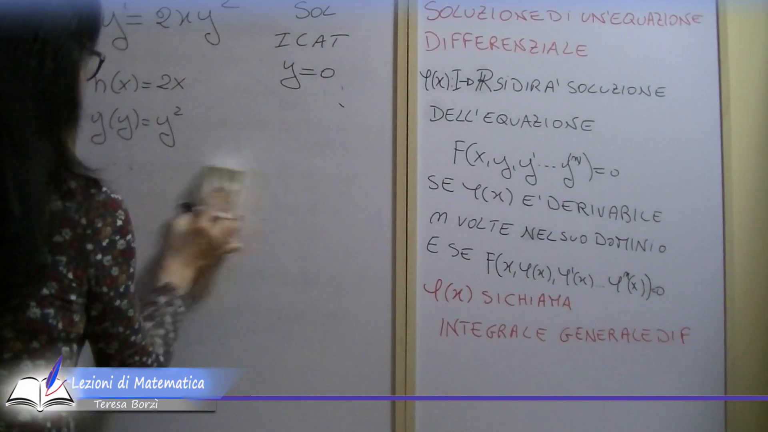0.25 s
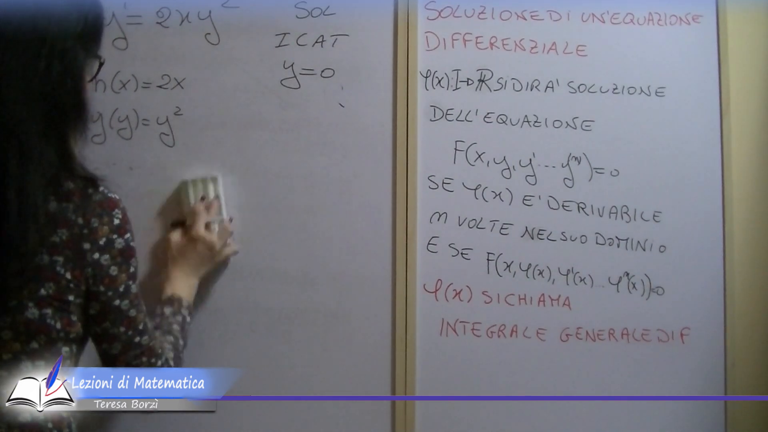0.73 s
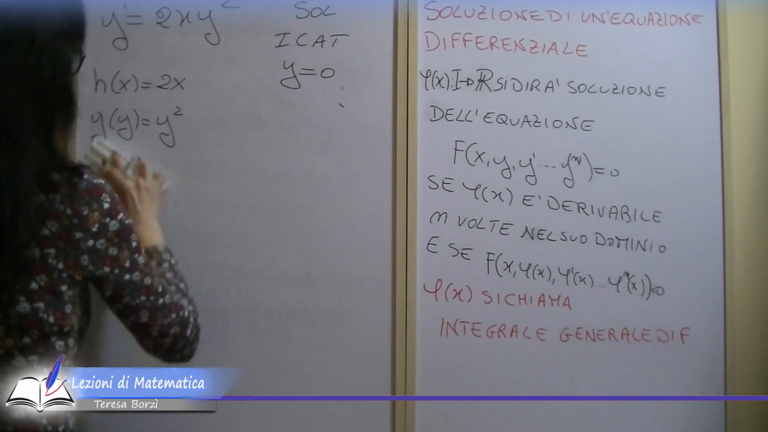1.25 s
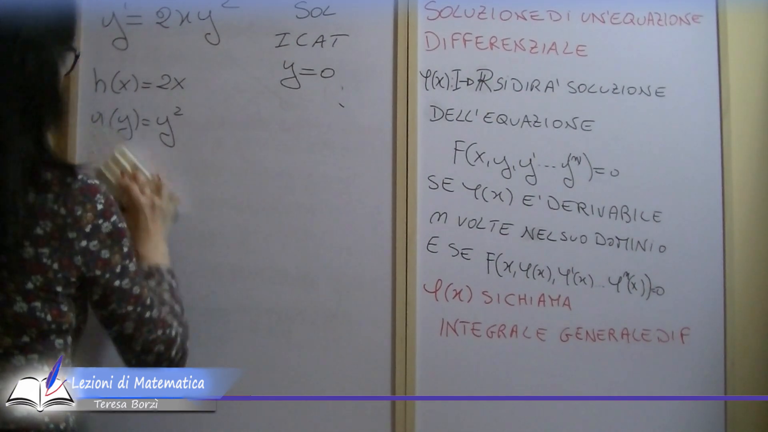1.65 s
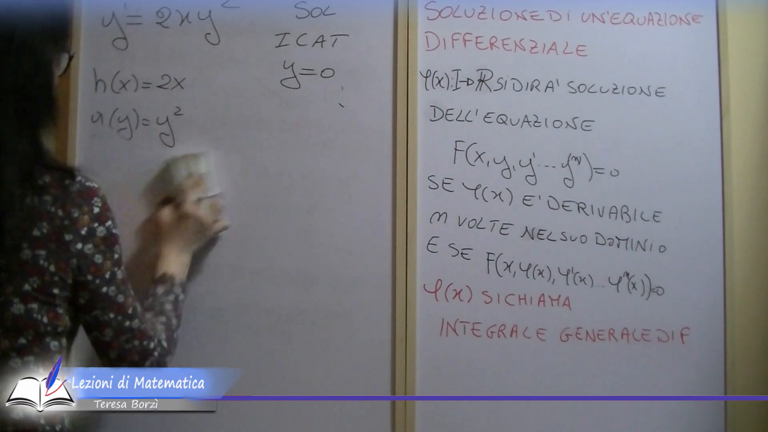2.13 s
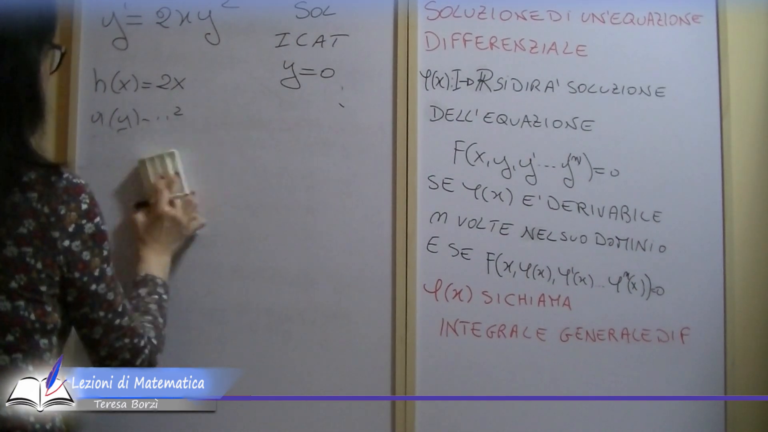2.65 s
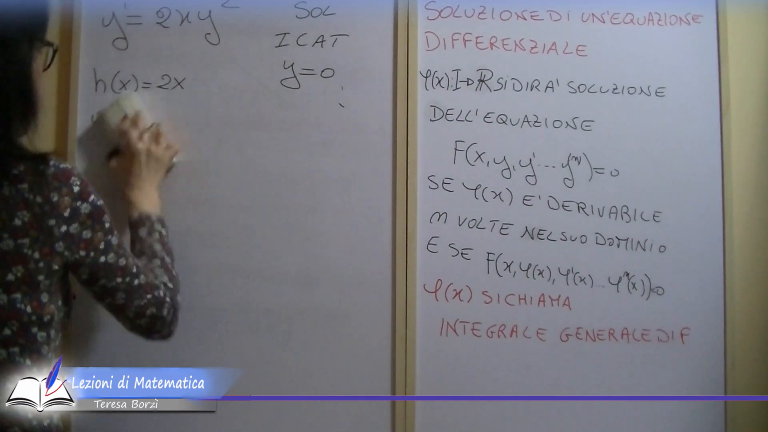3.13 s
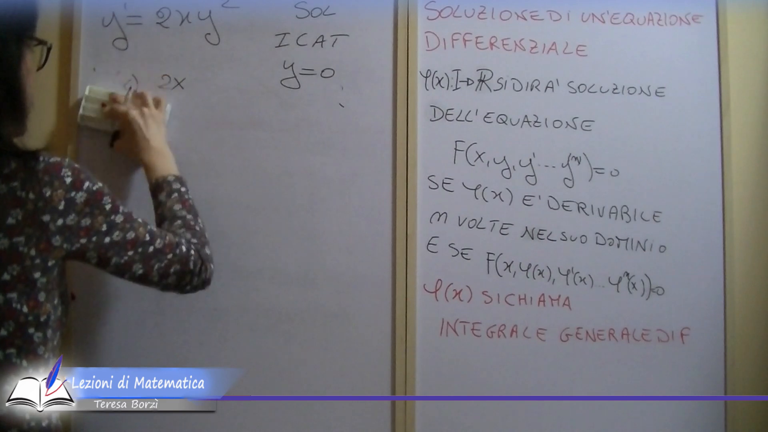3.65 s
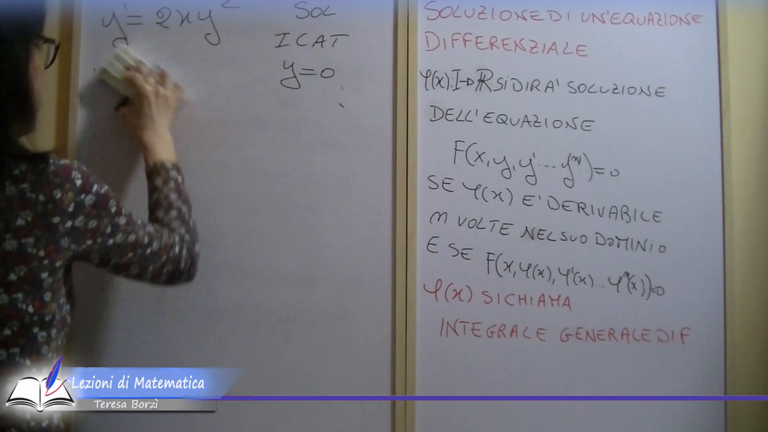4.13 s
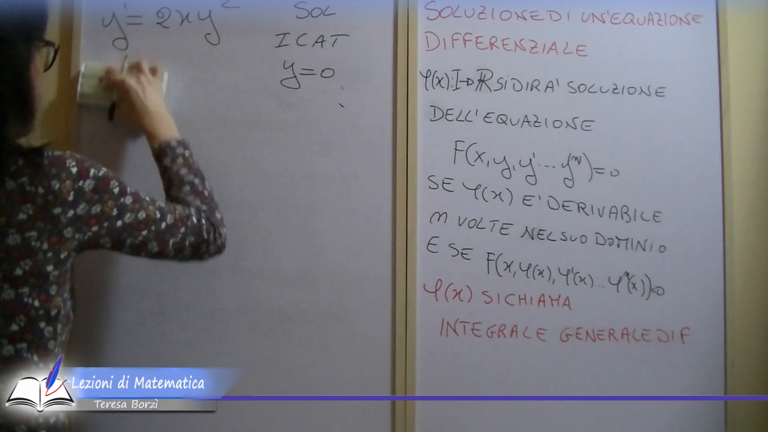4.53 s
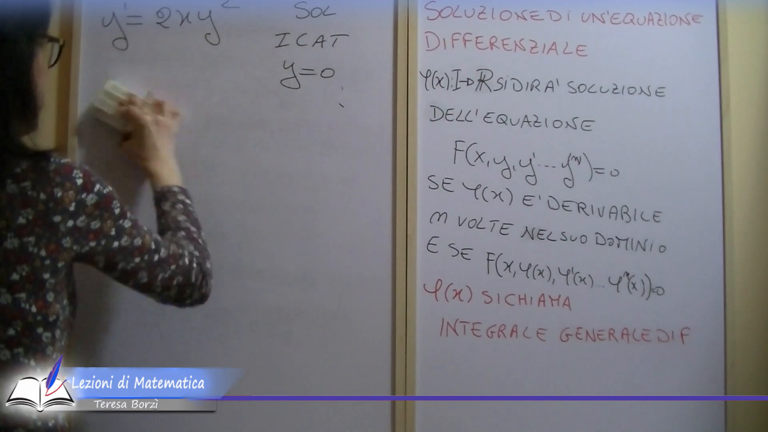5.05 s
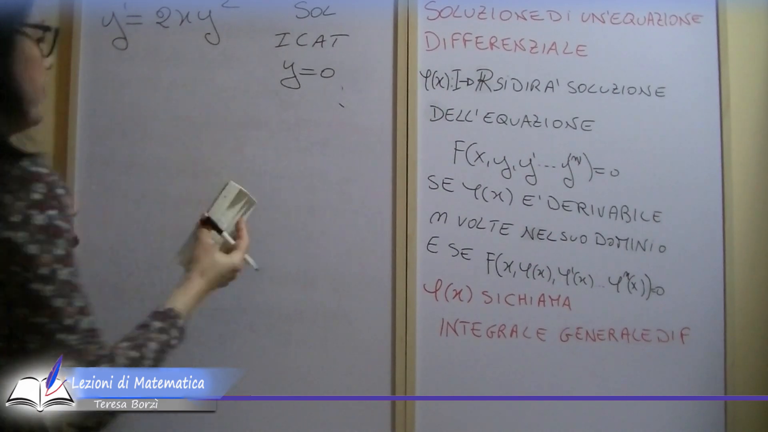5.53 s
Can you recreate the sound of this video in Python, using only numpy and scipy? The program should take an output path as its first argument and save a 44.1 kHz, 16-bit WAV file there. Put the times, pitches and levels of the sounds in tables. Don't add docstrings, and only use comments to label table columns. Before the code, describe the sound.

In a small quiet room with constant soft air and microphone hiss, a felt eraser is already rubbing a whiteboard. The dry, breathy strokes run almost without a break, dipping briefly as the direction turns, most clearly near 1.0, 1.4, 3.4 and 4.4 seconds. The panel gives the hiss a slight midrange ring, and faint low rumbles come about twice a second as the arm leans in. At 1.3 seconds the wrist meets the board with a dull, soft bump; slight fibre catches brush by around 1.2, 3.6 and 4.9. From about 5.1 the rubbing eases away, and at 5.4 the felt peels off with a small scuff. A light, short tap on the block follows at 5.53, then soft finger fumbling from 5.6 to the end. The sound is nearly centred, hollow and comb-coloured by a very short echo, with barely audible hum and a thin high whistle.

```python
import sys
import numpy as np
from scipy import signal
from scipy.fft import rfft, irfft, next_fast_len
from scipy.io import wavfile

SR = 44100
rng = np.random.default_rng(int(sys.argv[2]) if len(sys.argv) > 2 else 0)


def dump_mix(stems):
    frames = np.atleast_2d(stems).T
    limited = np.clip(frames, -1, 1)
    pcm = np.round(limited * 32767).astype(np.int16)
    wavfile.write(sys.argv[1], SR, pcm)


def volts_from_decibels(level):
    exponent = np.asarray(level, float) / 20
    return 10 ** exponent


N = 255383
T = np.arange(N) / SR
PAD = next_fast_len(N + 8192)
HZ = np.maximum(np.arange(PAD // 2 + 1) * SR / PAD, 1)

# frequency in Hz, level in dB.
AIR_COLOUR = [(30, -28), (100, -33), (250, -13), (535, -2), (1100, -0.5), (2000, -2), (4500, -3),
              (6600, -6), (9000, -8.5), (12000, -13.5), (15700, -30)]
# frequency in Hz, side minus middle in dB.
AIR_WIDTH = [(30, 2), (200, -3), (700, -14), (2000, -16), (5500, -16), (8000, -17), (15000, -27)]
# frequency in Hz, level in dB.
FELT_COLOUR = [(150, -49), (250, -35), (545, -19.5), (637, -32), (707, -6), (771, -10.5), (826, -7.5),
               (1130, -2.5), (1340, -4), (2590, -4), (3250, -4), (5090, -3.5), (6720, -10.5), (9340, -8),
               (15700, -17.5)]
# frequency in Hz, side minus middle in dB.
BOARD_WIDTH = [(60, -8), (380, -12), (700, -18), (1290, -27), (2400, -22), (3500, -20), (5300, -14),
               (7500, -17.5), (10000, -17), (12000, -18.5), (15000, -28)]
# frequency in Hz, width in Hz, level over the hiss in dB.
BOARD_RINGS = [(1010, 58, -4.5), (1126, 31, -2), (1224, 40, -7), (678, 16, -10), (862, 18, -9),
               (3235, 60, -8), (3300, 59, -5.5), (3330, 230, -12.5), (4220, 1800, -7.5), (10400, 2300, -1)]
# time in seconds, extra share of ringing.
PANEL_SHARE = [(0.0, .6), (0.6, 0.47), (1.0, -0.041), (1.6, .2), (2.3, 0.25), (2.9, 0.38), (3.5, -.3),
               (4.3, -.25), (5.2, 0.025)]
# time in seconds, speed as hiss in dB, pressure in dB,
# pad flat on its fine face in dB.
ARM_SWEEP = [(0.0, -41.5, -0.5, -1), (0.33, -43, -2, 0), (0.57, -41.5, -1, 0.5), (0.92, -41, -1, -2),
             (1.14, -41, -3.5, -3), (1.33, -41.5, 1.5, -4), (1.6, -42, -0.5, -1.5), (1.9, -42, 0.5, -0.5),
             (2.33, -41, -1, -1.5), (2.63, -44.5, -0.5, .5), (2.98, -43.5, 0, -0.5), (3.1, -41, 2, -2.5),
             (3.55, -40.5, -1, -2), (3.75, -41.5, 0, -.5), (4.04, -40.5, 0, -1.5), (4.36, -42.5, -1.5, -2),
             (4.6, -42, 0.5, -1.5), (5.07, -40.5, 1.5, -1.5)]
# time in seconds, loss in dB, half length in seconds.
STROKE_TURNS = [(0.142, 2.5, 0.03), (0.723, 2, 0.081), (1.008, 5, 0.033), (1.425, 10, .072),
                (1.77, 2, 0.049), (2.1, 1.5, 0.11), (2.48, 3, 0.043), (3.2, 3, 0.036), (3.425, 5.5, .03),
                (3.606, 4.5, .045), (3.88, 3, 0.058), (4.172, 2.5, .04), (4.307, 2, 0.051),
                (4.43, 4.5, 0.028), (4.844, 2, 0.04), (4.998, 1.5, 0.036)]
# frequency in Hz, level in dB.
RUMBLE_COLOUR = [(40, -22), (70, -8), (110, -4.5), (190, -1), (300, 4.5), (450, 0), (700, -37)]
# time in seconds, rumble in dB.
ARM_LEANS = [(0.17, -65), (0.65, -69.5), (1.13, -70), (1.34, -70), (1.63, -70), (2.08, -74), (2.56, -71),
             (3.06, -70.5), (3.55, -72), (4.0, -70), (4.51, -70), (4.98, -70), (5.42, -77), (5.6, -75)]
# time in seconds, frequency in Hz, width in Hz,
# time to fall 60 dB in seconds, level in dB.
SMALL_RUBS = [(0.002, 650, 300, 0.69, -52), (0.15, 350, 300, 0.67, -54.5), (1.325, 950, 170, .13, -46),
              (5.298, 1600, 690, .04, -52), (5.34, 1130, 60, .5, -56), (5.422, 900, 150, .17, -45),
              (5.435, 5855, 330, 0.33, -51), (5.455, 950, 100, .1, -48), (5.655, 1900, 1400, .11, -49),
              (5.69, 570, 120, 0.15, -65), (5.783, 1000, 1900, 0.33, -46), (5.787, 1040, 360, .25, -53)]
FIBRE_CATCHES = [
    (1.17, 5000, 1100, .14, -52),
    (3.64, 7100, 1200, .14, -56),
    (4.85, 5300, 2000, .11, -55),
    (5.41, 5500, 2500, .11, -56),
]
# frequency in Hz, width in Hz,
# time to fall 60 dB in seconds, level in dB.
WRIST_BUMP = [(262, 33, .64, -57), (413, 50, .57, -51.5), (540, 83, 0.64, -48.5), (710, 340, 0.22, -39.5),
              (2190, 220, .1, -45)]
FELT_PEEL = [(80, 80, .15, -86), (1900, 1400, .16, -47), (4440, 600, .12, -49.5), (4750, 660, 0.14, -48),
             (11500, 5000, 0.32, -54)]
TAP_IN_ROOM = [(526, 240, 0.64, -50)]
HAND_REGRIP = [(392, 100, 0.5, -63), (540, 110, 0.32, -57.5), (1290, 550, .2, -46.5), (1900, 500, .2, -46),
               (2600, 3500, 0.25, -49), (9500, 6000, .3, -60)]
# frequency in Hz, level in dB, time to fall 60 dB in seconds.
BLOCK_RINGS = [(540, -6, 0.036), (1400, -2, .012), (2050, -4, .012)]
# frequency in Hz, level in dB.
ECHO_GAIN = [(300, -12), (1000, -5), (3000, -7), (8000, -6.5), (15000, -7)]
# frequency in Hz, average level in dB.
SCAN_WHISTLES = [(15625, -61), (11725.5, -80), (7825.3, -76)]
# frequency in Hz, average level in dB.
MAINS_HUM = [(50, -104), (100, -98), (150, -91), (200, -86), (250, -89)]

TAP_S = 5.5315


def rms_one(x):
    return x / np.sqrt(np.mean(x ** 2) + 1e-20)


def in_time(rows):
    s, *columns = np.transpose(rows)
    return [np.interp(T, s, c) for c in columns]


def at_hz(points, hz):
    table_hz, db = np.transpose(points)
    return np.interp(np.log(hz), np.log(np.maximum(table_hz, 1)), db)


def drift(rate):
    r = np.exp(-80 * np.pi * rate / SR)
    noise = rng.standard_normal(N // 40 + 2002)
    slow = signal.lfilter([1], [1, -2 * r, r * r], noise)[2000:]
    return np.interp(np.arange(N) / 40, np.arange(len(slow)), rms_one(slow))


def resonate(x, hz, width_hz):
    r = np.exp(-np.pi * width_hz / SR)
    feed = np.array([1, 0, -1]) * (1 - r * r) / 2
    return signal.lfilter(feed, [1, -2 * r * np.cos(2 * np.pi * hz / SR), r * r], x)


def coloured(colour, spread, side_db=0):
    mid, side = rfft(rng.standard_normal((2, PAD))) * volts_from_decibels(at_hz(colour, HZ))
    return np.array([mid, side * volts_from_decibels(at_hz(spread, HZ) + side_db)])


def left_right(mid_side):
    return mid_side[0] + mid_side[1] * [[1], [-1]]


def swell(s, rise, t60):
    return np.where(T < s, np.exp(-((T - s) / rise) ** 2), volts_from_decibels(-60 * np.maximum(T - s, 0) / t60))


def air():
    noise = irfft(coloured(AIR_COLOUR, AIR_WIDTH), PAD)[:, :N]
    return rms_one(left_right(noise)) * volts_from_decibels(-49)


def stroke():
    speed_db, pressure_db, flat_db = in_time(ARM_SWEEP)
    slowed_db = sum(db * np.exp(-((T - s) / half) ** 2) for s, db, half in STROKE_TURNS)
    eased_db = 290 * np.maximum(T - 5.054, 0) ** 2
    hiss_db = speed_db - slowed_db - eased_db
    body_db = pressure_db + 0.03 * slowed_db
    fine_db = flat_db - 0.18 * slowed_db
    return hiss_db, body_db, fine_db


def felt():
    hiss_db, body_db, fine_db = stroke()
    slips = coloured(FELT_COLOUR, BOARD_WIDTH)
    rings = sum(volts_from_decibels(db) / (1 + ((HZ - hz) / width) ** 2) for hz, width, db in BOARD_RINGS)
    slips = slips * (1 + rings)
    scale = np.std(irfft(slips[0] * (HZ > 2000) * (HZ < 6300), PAD))
    pressure_db = 0.63 * drift(7.0) + 0.28 * drift(40)
    out = 0
    for centre in 250 * 2 ** np.arange(0, 6.5, 0.5):
        share = np.cos(np.pi * np.clip(np.log2(HZ / centre), -0.5, 0.5)) ** 2
        low = np.interp(np.log(centre), np.log([1500, 3000]), [1, 0])
        high = np.interp(np.log(centre), np.log([5200, 8000]), [0, 1])
        band_db = low * body_db + high * fine_db + pressure_db + 0.48 * drift(3.8)
        out = out + irfft(slips * share, PAD)[:, :N] * volts_from_decibels(band_db)
    panel_hz, panel_width_hz = 1130, 61
    panel = irfft(slips / (1 + ((HZ - panel_hz) / panel_width_hz) ** 2), PAD)[:, :N]
    out = out + panel * in_time(PANEL_SHARE)[0]
    contact = np.clip((5.38 - T) / 0.032, 0, 1)
    return left_right(out) / scale * volts_from_decibels(hiss_db - 0.5) * contact


def rumble():
    rise_s, t60_s, creak_db = 0.07, 0.6, -86
    flex = volts_from_decibels(creak_db) + sum(volts_from_decibels(db) * swell(s, rise_s, t60_s) for s, db in ARM_LEANS)
    noise = irfft(coloured(RUMBLE_COLOUR, BOARD_WIDTH, side_db=-16.0), PAD)[:, :N]
    return rms_one(left_right(noise)) * flex * volts_from_decibels(2.5)


def scuffs(rows):
    out = 0
    grit = rng.standard_normal(N) * volts_from_decibels(drift(60))
    for s, rise, hz, width_hz, t60, level_db in rows:
        tone = resonate(grit, hz, 1.74 * width_hz)
        tone = resonate(tone, hz, 1.74 * width_hz)
        out = out + rms_one(tone) * swell(s, rise, t60) * volts_from_decibels(level_db)
    return out


def handling():
    # moment in seconds, rise in seconds, resonances
    knocks = [(1.303, 0.019, WRIST_BUMP), (5.41, 0.0065, FELT_PEEL),
              (5.617, 0.017, HAND_REGRIP), (TAP_S, 0.0044, TAP_IN_ROOM)]
    centre = [(s, rise, *part) for s, rise, parts in knocks for part in parts]
    centre += [(s, 0.073 * t60, hz, width, t60, db) for s, hz, width, t60, db in SMALL_RUBS]
    side = [(s, 0.11 * t60, hz, width, t60, db) for s, hz, width, t60, db in FIBRE_CATCHES]
    return left_right([scuffs(centre), scuffs(side)])


def tap():
    age = np.maximum(T - TAP_S, 0)
    rings = sum(volts_from_decibels(-36.5 + db - 60 * age / t60) * np.sin(2 * np.pi * hz * age)
                for hz, db, t60 in BLOCK_RINGS)
    return signal.sosfilt(signal.butter(4, 330, "high", fs=SR, output="sos"), rings)


def scene():
    return air() + felt() + rumble() + handling() + tap()


def low_pass(x):
    return signal.sosfilt(signal.butter(12, 16330, fs=SR, output="sos"), x)


def record(dry):
    echo_s, low_hz, high_hz, top_hz = 299.1 / 44100, 1735, 6405, 15720
    thin = 1j * HZ / low_hz / (1 + 1j * HZ / low_hz) / (1 + 1j * HZ / high_hz)
    loop = volts_from_decibels(at_hz(ECHO_GAIN, HZ)) * thin * np.exp(-2j * np.pi * HZ * echo_s)
    hiss = rfft(rng.standard_normal(PAD)) * volts_from_decibels(-59.5) * HZ ** 2 / (HZ ** 2 + 7000 ** 2)
    combed = irfft((rfft(dry, PAD) / (1 + loop) + hiss) * (HZ < top_hz), PAD)[:, :N]
    leak = sum(np.sqrt(2) * volts_from_decibels(db) * np.sin(2 * np.pi * hz * T) for hz, db in SCAN_WHISTLES + MAINS_HUM)
    balance = volts_from_decibels([[0.15], [-0.15]])
    return low_pass((combed + leak) * balance)


dry = scene()
out = record(dry)
dump_mix(out)
```